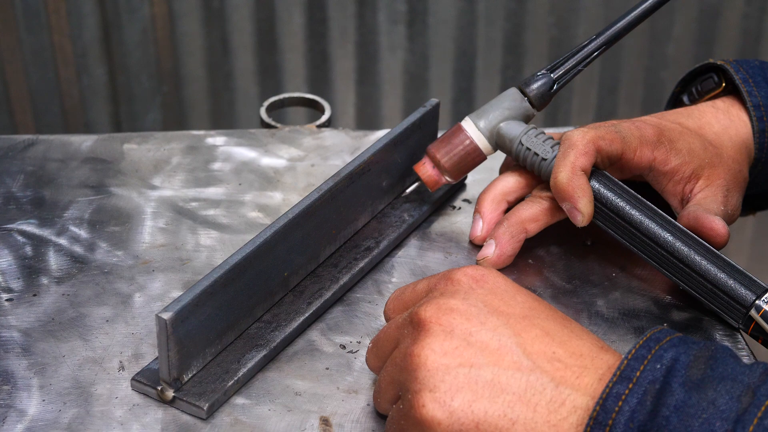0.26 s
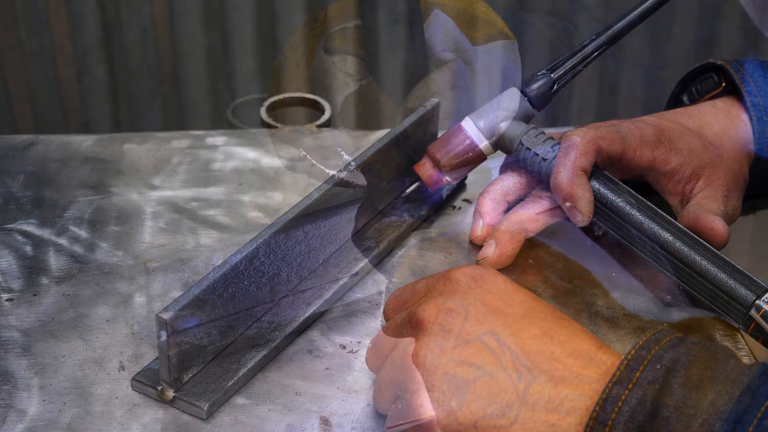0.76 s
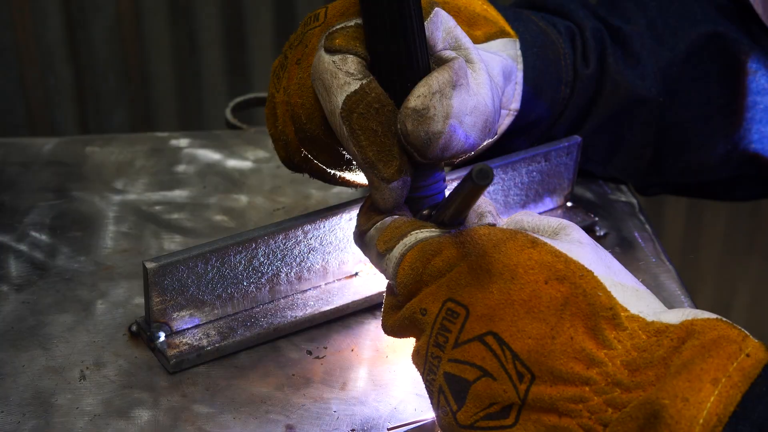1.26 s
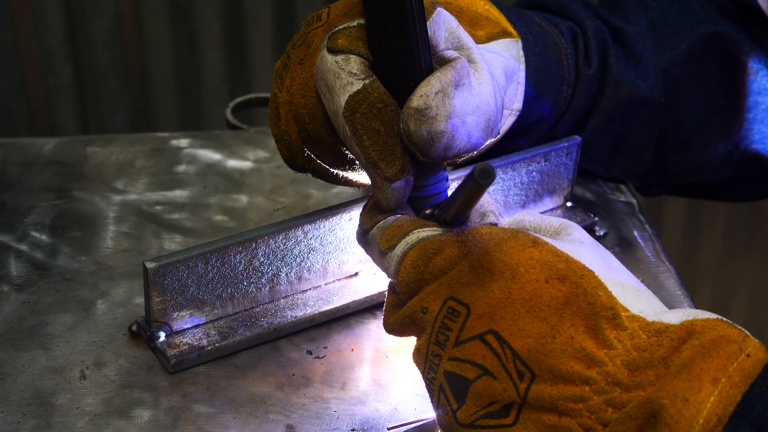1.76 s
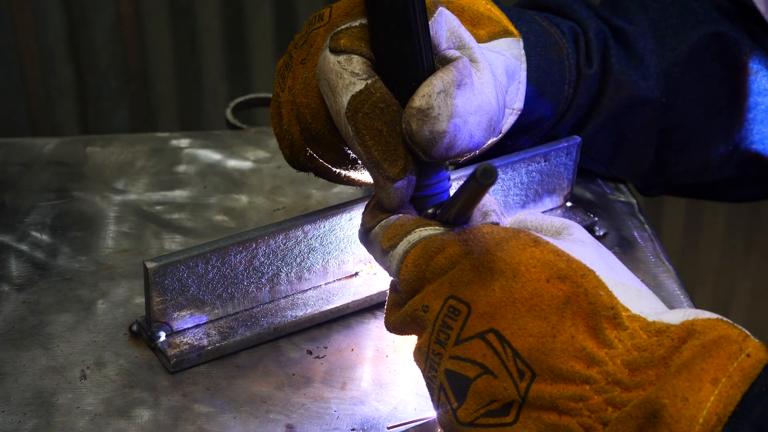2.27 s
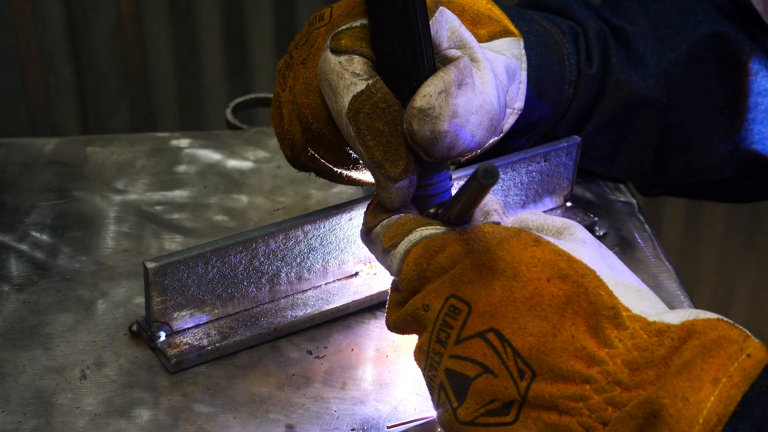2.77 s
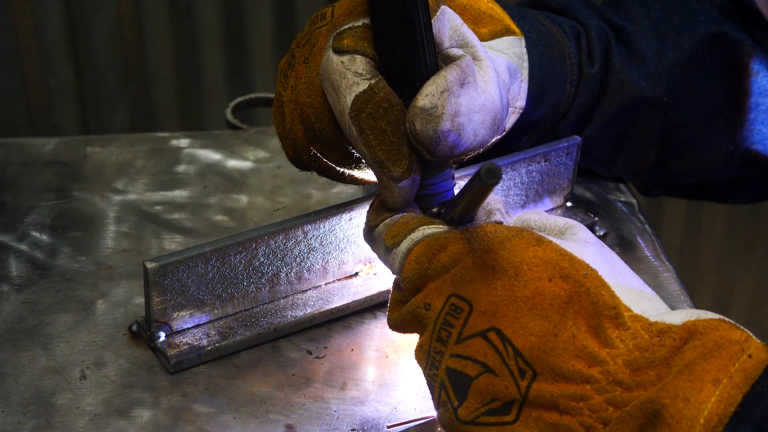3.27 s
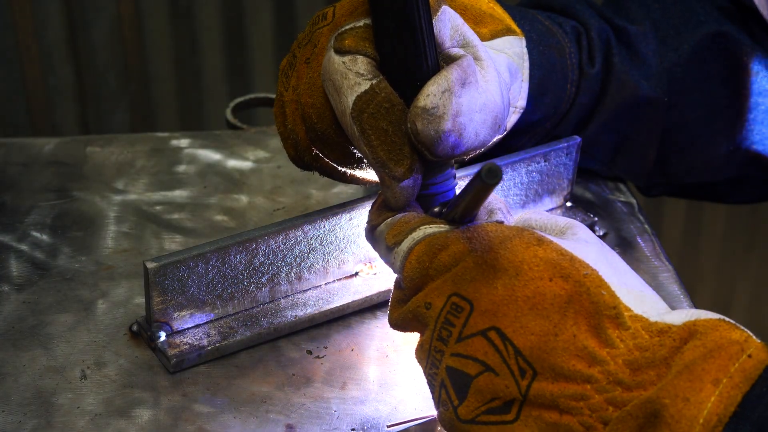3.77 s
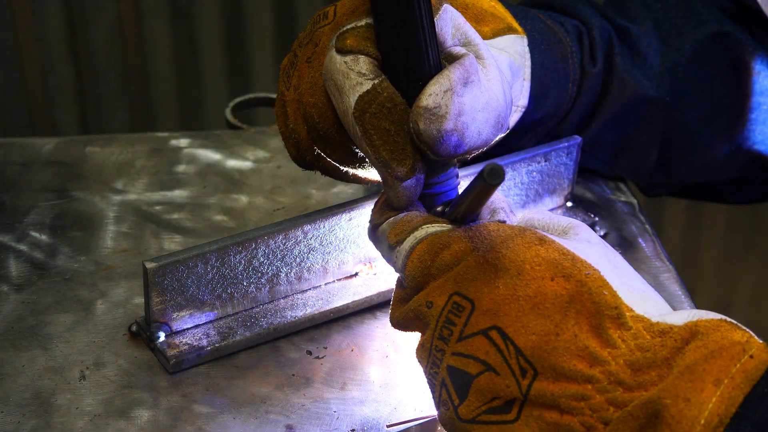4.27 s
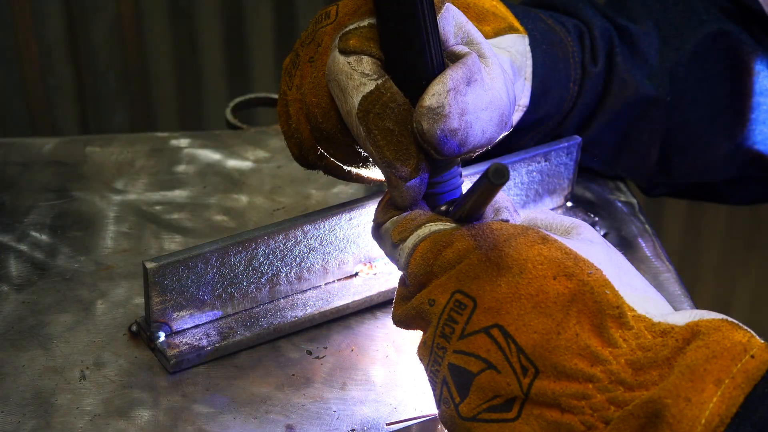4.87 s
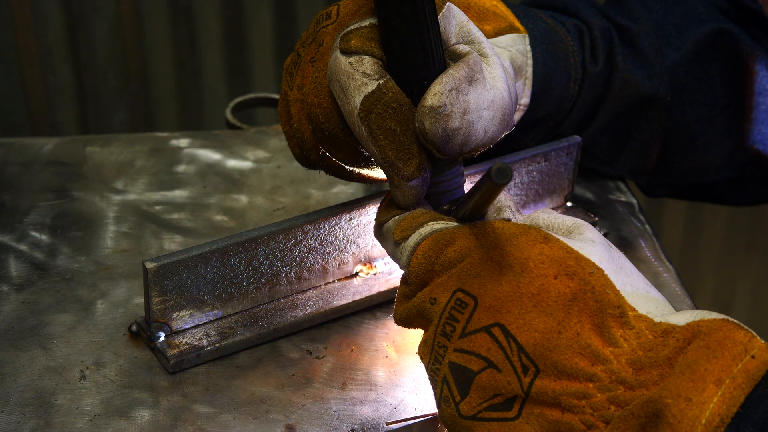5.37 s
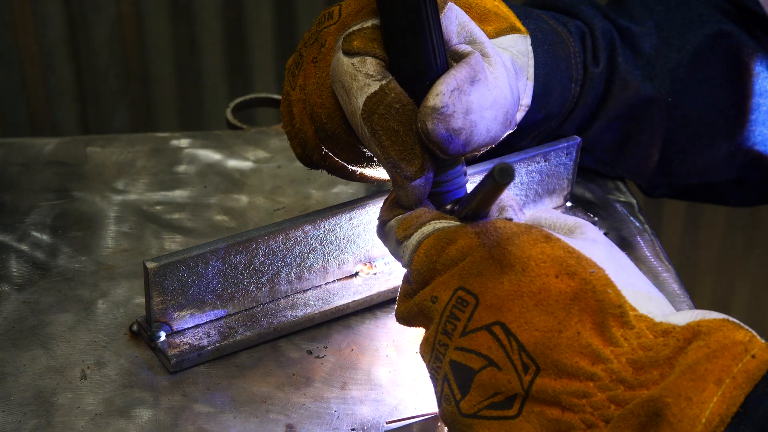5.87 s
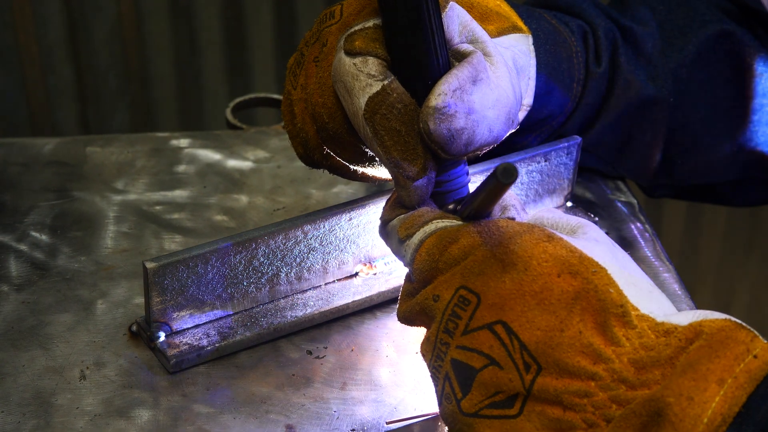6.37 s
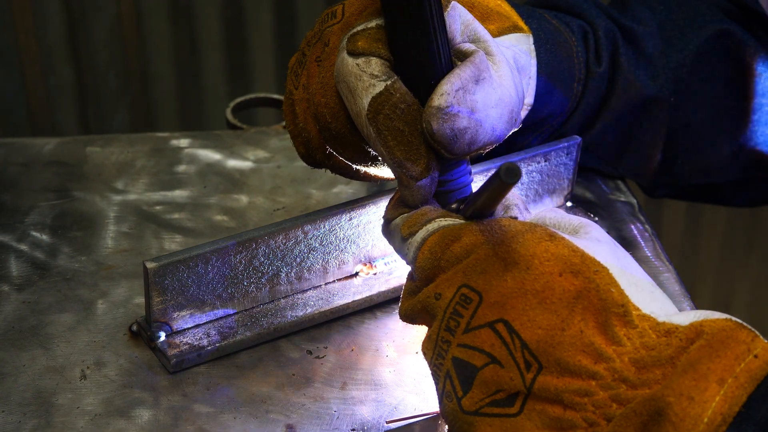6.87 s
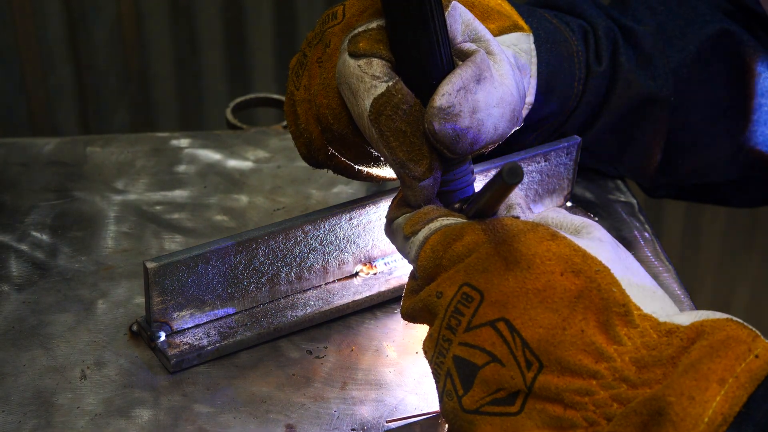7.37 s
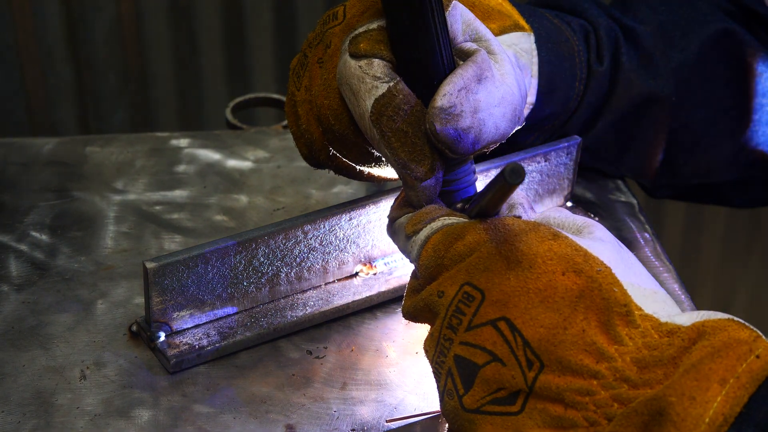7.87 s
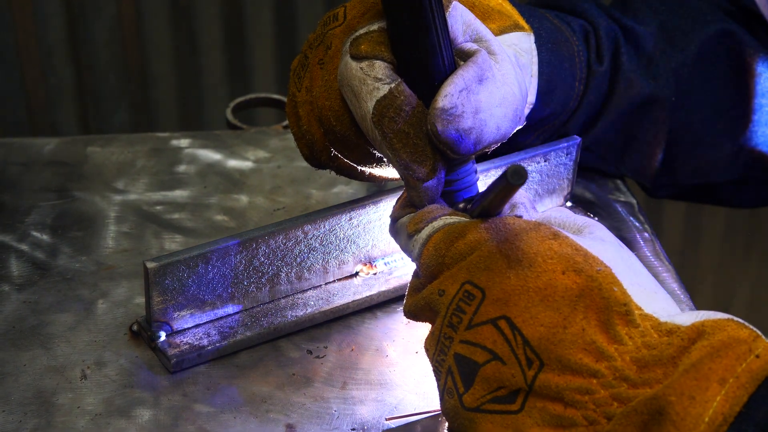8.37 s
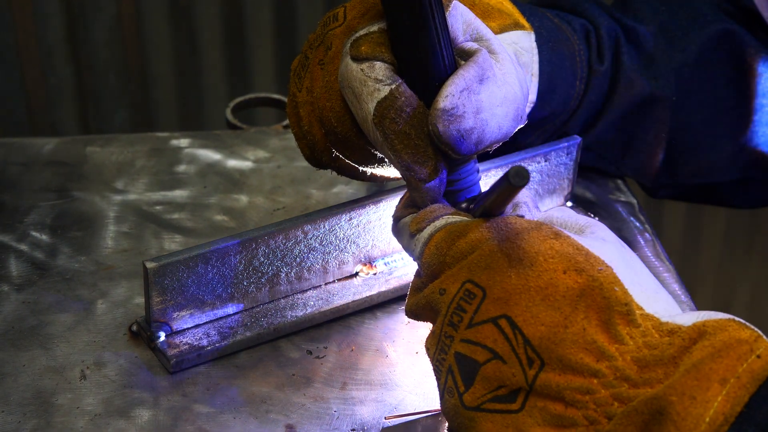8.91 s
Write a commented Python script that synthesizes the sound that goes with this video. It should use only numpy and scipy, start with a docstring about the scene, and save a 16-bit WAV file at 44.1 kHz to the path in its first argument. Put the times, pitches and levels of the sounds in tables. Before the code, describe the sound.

A close welding arc burns on steel with a bright, even hiss of gas, heard in mono in a workshop. It cuts in after a short stretch of quiet room rumble, a faint metallic ring and a brief silence. Under the hiss are the machine's low hum and fan, with a far-off drone like engines coming and going. One soft, dull blip sounds in the second half.

```python
"""A TIG arc runs along a steel joint in a workshop, close to a mono microphone. Arc and shielding gas
hiss steadily, coloured by cup and joint and swelling slightly with each even step of the torch.
The welder's fan and mains hum lie beneath, and one soft, dull blip passes. Before the weld come
quiet room tone, a faint ring of steel dying away and a moment of silence. Beyond the walls a low drone,
like distant engines, swells and fades."""
import sys
import numpy as np
from scipy import signal
from scipy.fft import rfft, irfft, next_fast_len
from scipy.io import wavfile
from scipy.ndimage import uniform_filter1d

SR = 44100
rng = np.random.default_rng(int(sys.argv[2]) if len(sys.argv) > 2 else 0)


def unload_wav(signal):
    """Save mono or channel-first audio to the path in sys.argv[1] as 16-bit WAV at rate SR, clipped to [-1, 1]."""
    wavfile.write(
        sys.argv[1],
        SR,
        np.round(np.clip(np.atleast_2d(signal).T, -1, 1) * 32767).astype(np.int16),
    )


N = 403074
TIME = np.arange(N) / SR
SILENCE_STARTS_S, ARC_STARTS_S = 0.656, 1.041


def plasma(pops_per_s=900, pop_spread_db=3, pop_db=-12, flutter_db=0.32):
    """Fluttering turbulence of the arc, with tiny pops from the molten pool."""
    sizes = gain_of(pop_spread_db * np.minimum(rng.exponential(1, N), 4))
    pops = sizes * rng.choice([-1, 1], N) * (rng.random(N) < pops_per_s / SR)
    turbulence = rng.standard_normal(N) * gain_of(flutter_db * wander(rate_hz=70))
    return unit_rms(turbulence + gain_of(pop_db) * unit_rms(pops))


# Gas roar, hiss and fine sizzle, close to the microphone: level_db, growth_db_per_s, step_swing_db
ARC_VOICES = [(-31.5, 0.2471, .85), (-21, 0.02, 0), (-26.5, -0.11, .5)]

def arc(step_crest_s=1.083, step_s=0.667, unsteady_db=0.24):
    """The plasma heard through the cavity at the torch; roar and sizzle swell with each hand step."""
    hz, t, spectrum = signal.stft(plasma(), SR, nperseg=2048, noverlap=1536)
    colour = torch_colour(hz, t)
    power = np.mean(colour ** 2, axis=1)
    step = np.cos(2 * np.pi * (t - step_crest_s) / step_s)
    bands_hz = [(250, 1100), (1900, 4500), (10000, 15500)]  # roar, hiss, sizzle
    balance_db = 0
    for k, (onset_db, growth_db_per_s, swing_db) in enumerate(ARC_VOICES):
        level_db = onset_db + growth_db_per_s * (t - ARC_STARTS_S) + swing_db * step
        level_db += unsteady_db * np.interp(t, TIME, wander(rate_hz=2.3))
        # each band holds its own level and blends into its neighbours
        low_hz, high_hz = bands_hz[k]
        band_db = 10 * np.log10(np.mean(power * (hz > low_hz) * (hz < high_hz)))
        share = np.interp(hz, np.ravel(bands_hz), np.repeat(np.arange(len(bands_hz)) == k, 2))
        balance_db += share[:, None] * (level_db - band_db)
    _, hiss = signal.istft(spectrum * colour * gain_of(balance_db), SR, nperseg=2048, noverlap=1536)
    return hiss[:N]


# Smooth spectrum of the arc in its gas stream, close up: frequency_hz, relative_db
GAS_SPECTRUM = [(100, -10.5), (550, -11), (950, -8), (1200, -17.5), (1750, -10.5), (2050, -2), (3000, -0.5),
                (3800, -2.5), (4300, -10.5), (5000, -16), (10400, -14), (11500, -8), (14700, -8),
                (15800, -23)]
# Resonances of the gas cup and the hollow between gloves and joint: pitch_hz, half_width_hz, lift_db
CAVITY_MODES = [(420, 85, 6), (650.4, 24, 7.5), (769, 68, 9.5), (1433, 105, 4), (2560, 133, 4),
                (3120, 108, 4), (3668, 127, 5), (5760, 210, 4), (6670, 200, 9), (7620, 220, 4.5),
                (10010, 170, 5), (10990, 190, 4.5), (13500, 450, 3.5)]
# The torch hand along the joint: time_s, notch_hz, notch_depth_db, cavity_pitch_ratio, glove_opening_db
TORCH_PATH = [(1, 9380, 11, 1, -1), (3.5, 9380, 9.5, 0.995, -.5), (5, 9420, 11.5, 1.003, -1),
              (5.9, 9360, 11.5, 0.995, 0), (6.6, 9150, 13, 1, 2), (7.1, 9240, 12, 1.006, 1),
              (7.6, 9340, 13, 1.004, 0), (9.1, 9420, 13, 1, .7)]

def torch_colour(hz, t):
    """Cup, plate and gloves filter the hiss as the hand moves: a gain for each frequency and time."""
    path_s, *columns = np.transpose(TORCH_PATH)
    notch_hz, depth_db, tuning, opening_db = (np.interp(t, path_s, column) for column in columns)
    cavity_db = sum(lift_db * bell(hz, pitch, width) for pitch, width, lift_db in CAVITY_MODES)
    bin_hz = hz[:, None]
    colour_db = spectrum_db(GAS_SPECTRUM, bin_hz) + np.interp(bin_hz / tuning, hz, cavity_db)
    # the echo off the plate cancels a narrow band
    colour_db -= depth_db * bell(bin_hz, notch_hz, width_hz=370)
    # where the gloves part, treble slips out and the band below it hollows
    parting = bell(bin_hz, 7500, width_hz=900) - 0.92 * bell(bin_hz, 5100, width_hz=550)
    colour_db += opening_db * parting
    low_cut = bin_hz / np.hypot(bin_hz, 45)
    return gain_of(colour_db) * low_cut


# Echoes reaching the microphone off bench, helmet and wall: delay_s, amplitude_ratio
NEAR_ECHOES = [(.00428, -.05), (.0059, .07), (.00833, .08), (.01145, .07), (.01192, -.1), (.01339, -.06),
               (.01576, .06)]

def reflections(direct, cutoff_hz=3500):
    """Nearby surfaces add early echoes, which lose their treble."""
    dull = signal.sosfilt(signal.butter(1, cutoff_hz, fs=SR, output="sos"), direct)
    echoes = sum(gain * np.pad(dull, (round(delay_s * SR), 0))[:N] for delay_s, gain in NEAR_ECHOES)
    return direct + echoes


def low_blip(start_s=6.509, pitch_hz=435, peak_db=-21, rise_s=.005, t60_s=.06):
    """One brief, soft, dull blip during the weld."""
    t = np.maximum(TIME - start_s, 0)
    attack = np.minimum(t / rise_s, 1)
    decay = gain_of(peak_db - 60 * np.maximum(t - rise_s, 0) / t60_s)
    return attack * decay * np.sin(2 * np.pi * pitch_hz * t)


# Steel parts ringing as they are handled in the workshop: pitch_hz, half_width_hz, relative_db
STEEL_MODES = [(4020, 134, -3), (4740, 70, 0), (5100, 170, -3), (5800, 1400, -9)]

def steel_ring(level_db=-57, t60_s=0.94):
    """A faint, dense metallic ring that dies away."""
    ring = noise(lambda hz: sum(gain_of(db) * bell(hz, pitch, width) for pitch, width, db in STEEL_MODES))
    return ring * gain_of(level_db - 60 * TIME / t60_s)


# The welder's cooling fan, behind the arc: pitch_hz, width_hz, level_db
FAN_TONES = [(204, 13, -49), (372.5, 16, -53), (705, 12, -43), (965, 40, -52.5)]

def fan():
    """Blade tones, blurred by the air that the fan stirs."""
    return sum(gain_of(level_db) * noise(lambda hz: 1 / (1 + (2 * (hz - pitch_hz) / width_hz) ** 2))
               for pitch_hz, width_hz, level_db in FAN_TONES)


def mains_hum(pitch_hz=60.1, level_db=-44.5):
    """The welder's transformer hums under load."""
    return np.sqrt(2) * gain_of(level_db) * np.sin(2 * np.pi * (pitch_hz * TIME + rng.random()))


# Swells of the drone, far off: crest_s, rise_s, fall_s, pitch_hz, glide_hz_per_s, level_db
DRONE_SWELLS = [(.45, 0.28, .5, 87, 4.5, -35.5), (1.45, 0.49, .62, 64.1, 0.7, -30.5),
                (7.5, .12, .55, 77, 11, -35.5), (7.9, 1.2, 1.1, 63.1, 0, -39)]

def drone(crest_s, rise_s, fall_s, pitch_hz, glide_hz_per_s, level_db, waver_hz=0.61, throb_db=1.6):
    """A low tone from beyond the walls swells, glides and fades, throbbing a little."""
    t = TIME - crest_s
    cycles = np.cumsum(pitch_hz + glide_hz_per_s * t + waver_hz * wander(rate_hz=7.8)) / SR
    swell = bell(t, 0, np.where(t < 0, rise_s, fall_s))
    throb = gain_of(level_db + throb_db * wander(rate_hz=6))
    return np.sqrt(2) * swell * throb * np.sin(2 * np.pi * cycles)


def rumble(centre_hz=62, width_hz=9, level_db=-44.0):
    """The uneven low rumble under the drone."""
    return gain_of(level_db) * noise(lambda hz: bell(hz, centre_hz, width_hz))


# Workshop air all around the microphone: frequency_hz, relative_db
ROOM_SPECTRUM = [(15, -22), (45, -2.5), (70, -1), (120, -9.5), (220, -10), (350, -18.5), (800, -19),
                 (1300, -25.5), (2200, -39), (3200, -41), (7000, -44.5), (15500, -49)]

def room_tone(idle_db=-42, working_db=-41):
    """Dull rumble of the room's air, a little louder during the weld."""
    air = noise(lambda hz: gain_of(spectrum_db(ROOM_SPECTRUM, hz)))
    return gain_of(np.where(TIME < ARC_STARTS_S, idle_db, working_db)) * air


def gain_of(db):
    """Decibels to amplitude."""
    return 10 ** (np.asarray(db) / 20)


def unit_rms(x):
    """Scales to rms 1."""
    return x / np.sqrt(np.mean(x ** 2) + 1e-20)


def spectrum_db(points, hz):
    """Joins the points of a spectrum by straight lines on a log-frequency axis."""
    point_hz, point_db = np.transpose(points)
    return np.interp(np.log(hz + 1), np.log(point_hz + 1), point_db)


def bell(hz, centre_hz, width_hz):
    """A smooth peak of height 1."""
    return np.exp(-.5 * ((hz - centre_hz) / width_hz) ** 2)


def noise(shape):
    """Noise of rms 1 whose amplitude spectrum is shape(hz)."""
    size = next_fast_len(N)
    spectrum = rfft(rng.standard_normal(size)) * shape(np.fft.rfftfreq(size, 1 / SR))
    return unit_rms(irfft(spectrum, size)[:N])


def wander(rate_hz):
    """A smooth random drift of rms 1."""
    return noise(lambda hz: bell(hz, 0, rate_hz))


def scene():
    """Arc and welder up close once the weld starts, room and drone behind; both channels alike."""
    weld = reflections(arc()) + low_blip() + fan() + mains_hum() + rumble()
    background = room_tone() + steel_ring() + sum(drone(*swell) for swell in DRONE_SWELLS)
    mono = (TIME > ARC_STARTS_S) * weld + background
    return np.array([mono, mono])


def record(dry, cutoff_hz=15850):
    """The microphone is muted just before the weld, and the highest treble is cut throughout."""
    live = (TIME < SILENCE_STARTS_S) | (TIME > ARC_STARTS_S)
    gate = uniform_filter1d(live.astype(float), size=64)
    low_pass = signal.firwin(511, cutoff_hz, window=("kaiser", 9), fs=SR)
    return signal.oaconvolve(dry * gate, low_pass[None], "same")


dry = scene()
out = record(dry)
unload_wav(out)
```